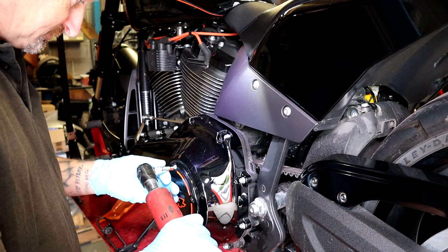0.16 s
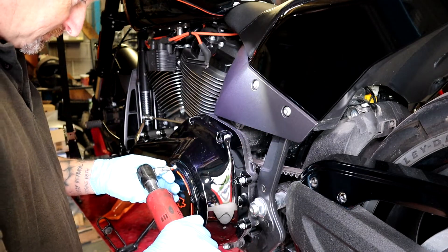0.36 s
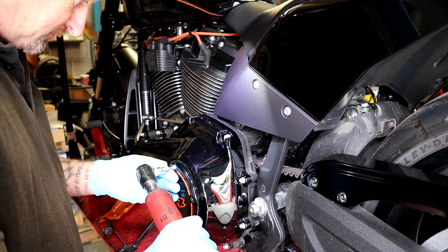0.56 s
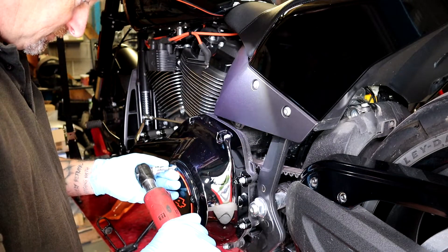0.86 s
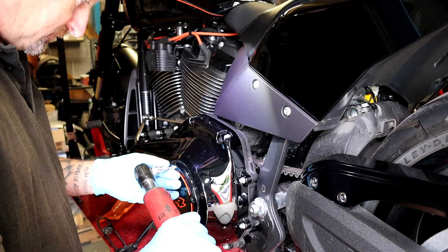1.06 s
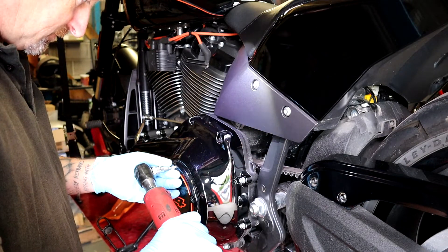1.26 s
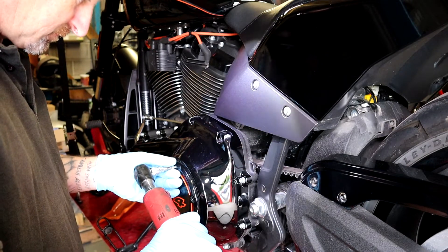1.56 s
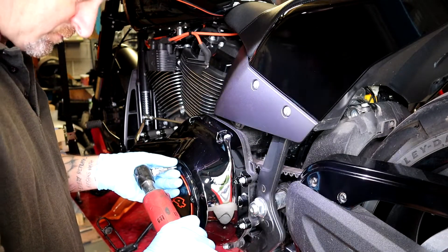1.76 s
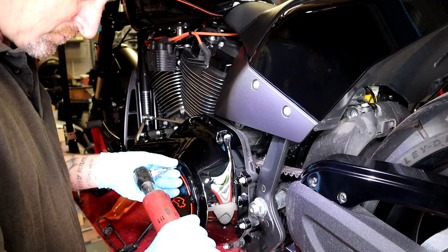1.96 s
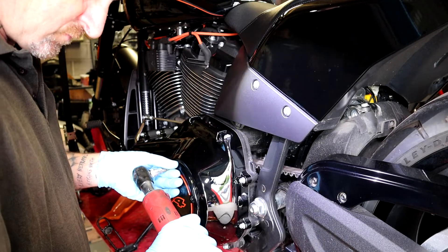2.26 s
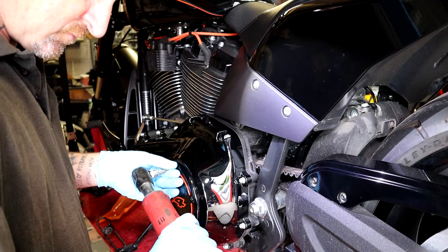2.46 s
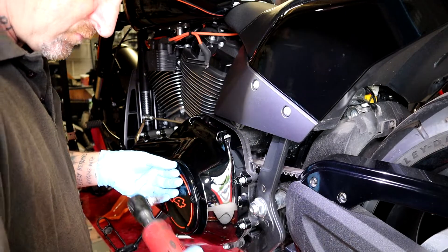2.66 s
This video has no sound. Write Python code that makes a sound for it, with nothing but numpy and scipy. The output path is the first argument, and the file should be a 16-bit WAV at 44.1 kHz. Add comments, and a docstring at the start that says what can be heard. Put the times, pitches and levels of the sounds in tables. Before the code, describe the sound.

A cordless power ratchet runs close by in a garage. Faint fan-like hum, then at 0.1 s a tiny whistle, hard loose knocks and a short hollow metal ring as a screw breaks free. A harsh, grating buzz of rapid clicks rises to its fastest near 0.8 s, sinks by 1.5 s, climbs mildly to 2.3 s, stops around 2.57 s with weak clicks and a short room tail, leaving hum.

```python
"""A cordless ratchet spins a screw out in a garage. A fan-like hum, filtered noise, stands behind throughout.
The speed switch whistles thinly (a sine), then the tool takes up with a few loose knocks. Its motor turns a crank:
each turn grinds the gears and scrapes the pawl (random taps) and knocks the drive home (bursts of noise), over tones.
Gain control ducks everything as it starts. The screw breaks loose, a cover rings (sines); the crank speeds up, slows,
speeds up again a little and runs out with three last loose knocks. A noise tail gives the garage."""
import sys
import numpy as np
from scipy import signal
from scipy.io import wavfile
from scipy.ndimage import uniform_filter1d

SR = 44100
rng = np.random.default_rng(int(sys.argv[2]) if len(sys.argv) > 2 else 0)


def generate_wav(signal):
    """Clip the signal to [-1, 1] and save it as 16-bit WAV at the path in sys.argv[1]."""
    frames = np.transpose(np.atleast_2d(signal))
    scaled = np.clip(frames, -1, 1) * 32767
    pcm = np.round(scaled).astype(np.int16)
    wavfile.write(sys.argv[1], SR, pcm)


def gain_from_db(level_db):
    """Turn a decibel level (scalar or array-like) into a linear amplitude factor."""
    decades = np.asarray(level_db, float) / 20
    return 10 ** decades


N = 123479

# Background hum spectrum. Each row: frequency in Hz, relative level in dB.
HUM_SPECTRUM = [(40, -53.5), (120, -20.5), (200, -26), (480, -19.5), (650, -5.5), (900, -5.5), (1050, -6.5),
                (1350, -20.5), (2500, -18), (3700, -28.5), (8000, -50), (15000, -51)]
# Crank speed over time. Each row: time in seconds, speed in turns per second.
CRANK_SPEED = [(0.12, 38.01), (0.2, 50.41), (0.28, 53.94), (0.4, 54.5), (0.52, 55.79), (0.62, 63.46),
               (0.72, 70.55), (0.8, 77.06), (0.88, 76.35), (0.96, 74.27), (1.06, 63.92), (1.16, 57.38),
               (1.28, 53.45), (1.42, 51.04), (1.52, 50.46), (1.64, 54.62), (1.8, 55.44), (2.05, 57.28),
               (2.2, 61.0), (2.3, 62.98), (2.38, 61.25), (2.46, 56.47), (2.56, 54.24)]
# Loudness of the running tool. Each row: time in seconds, gain in dB.
RUNNING_LEVEL = [(.09, -28), (0.101, -23), (0.114, -7), (0.119, 1.5), (.17, -3.5), (.23, -5.5), (.42, -6),
                 (.56, -4), (.63, -7), (.74, -5.5), (.85, -8), (1.05, -8.5), (1.22, -9.5), (1.37, -11),
                 (1.66, -10), (1.9, -9.5), (2.15, -9.5), (2.33, -8.5), (2.46, -10.5), (2.546, -11.5),
                 (2.571, -36.5), (2.6, -45)]
# Stroke within one crank turn, at the reference speed. Each row: place in the turn from 0 to 1,
# gear grind gain in dB, pawl scrape gain in dB.
STROKE_SHAPE = [(0, 1, -1), (.15, 2, 0), (.24, -3, -12), (.36, -6.5, -20), (.5, -1, -9), (.62, -4, -13),
                (.72, -1, -1), (.9, 0, 0)]
# Resonances of the tool housing. Each row: frequency in Hz, width in Hz, boost in dB.
HOUSING_RESONANCES = [(503.5, 113, 16), (940, 21, 3.5), (1917, 150, 3), (2230, 120, -1.5), (2360, 260, 0.5),
                      (4530, 500, -0.5)]
# Gear grind spectrum, before the housing. Each row: frequency in Hz, relative level in dB.
GRIND_SPECTRUM = [(60, -44.5), (200, -38), (300, -26), (420, -27), (560, -20.5), (705, -7), (1000, -5.5),
                  (1420, -8), (2000, -1), (2530, 2.5), (3050, -5), (4030, -3), (6500, -15), (10000, -36.5),
                  (11500, -22.5), (15500, -30.5)]
# Tones of crank and motor, at the reference speed. Each row: multiple of crank speed, middle level in dB.
CRANK_TONES = [(3, -47), (4, -42), (4.36, -39), (6, -33), (7, -33), (8, -29), (9, -25), (10, -24),
               (11, -24), (12, -24), (13, -23), (14, -26), (15, -25), (16, -26), (17, -25)]
# Pawl scrape spectrum, before the housing. Each row: frequency in Hz, relative level in dB.
SCRAPE_SPECTRUM = [(1500, -40), (3000, -10), (5000, -3), (7000, -6), (9800, -17.5), (11500, -12.5),
                   (15500, -43)]
# Knock spectrum, before the housing. Each row: frequency in Hz, relative level in dB.
KNOCK_SPECTRUM = [(500, -26), (1500, -21.5), (2500, 8), (3300, 2), (4500, 5), (6500, -12), (9800, -23.5),
                  (11500, -52), (15500, -65)]
# Loose knocks at take-up and run-out. Each row: time in seconds, strength of the driving impulse in dB.
SLACK_KNOCKS = [(0.1184, -1), (0.126, 2), (.136, -11), (0.15, -13), (0.164, 9), (.182, 6.5), (0.237, 6),
                (2.577, -21), (2.588, -11.5), (2.607, -14)]
# Cover ringing as the screw breaks loose. Each row: frequency in Hz, relative level in dB, t60 in seconds.
COVER_RINGS = [(510, 0, 0.18), (609, -3.5, 0.078), (720, -1, 0.14), (876, 1.5, 0.072), (960, -8, 0.17),
               (2100, 6, .08)]
# Decay of the garage. Each row: frequency in Hz, t60 in seconds.
GARAGE_DECAY = [(500, 0.7), (2500, 0.54), (5000, 0.44), (10000, 0.3), (15000, 0.2)]

HUM_DB, HUM_FLUTTER_DB = -29, 0.5
WHINE_S, WHINE_LENGTH_S, WHINE_HZ, WHINE_DB = 0.086, 0.024, 7800, -52
FIRST_TURN = -0.033  # crank position at the start, in turns
# Above the reference speed: shallower strokes, more grind and tone
REFERENCE_TURNS_PER_S, BLUR_PER_TURN_S = 53.8, 0.027
GRIND_DB_PER_TURN_S, TONES_DB_PER_TURN_S = 0.0859, 0.3745
ENGAGE_S = 0.118  # pawl and drive knock start here
GRIND_DB, GRIND_TAPS_PER_S, GRIND_SPREAD_DB = 0, 5000, 2.5
TONE_WAVER_DB, TONE_WAVER_S = 2.5, 0.1
SCRAPE_DB, SCRAPE_TAPS_PER_S, SCRAPE_SPREAD_DB = -8, 13000, 2.2
KNOCK_DB, KNOCK_AT_TURN, KNOCK_JITTER_TURN, KNOCK_SPREAD_DB = -5.5, 0.086, 0.03, 3.5
KNOCK_RISE_S, KNOCK_T60_S = 0.0006, 0.008
BITE_S, BITE_RISE_S, BITE_DB = 0.146, 0.0048, -3
GARAGE_DB = -14.5
KNEE_DB, SQUEEZE, RECOVER_DB_PER_S, AHEAD_S = -27, 0.38, 0.5, 0.016
SOFT_FROM = 0.6  # fraction of full scale


def evened(x):
    """Bring a layer to an rms of one."""
    return x / np.sqrt(np.mean(x ** 2) + 1e-20)


def read(points, hz):
    """Read a curve along a logarithmic frequency axis."""
    f, value = np.transpose(points)
    return np.interp(np.log(hz + 1), np.log(f + 1), value)


def coloured(x, points, housing=True):
    """Causal minimum-phase filter from a spectrum, with the housing's resonances on top."""
    hz = np.abs(np.fft.fftfreq(4096, 1 / SR))
    db = read(points, hz)
    if housing:
        for centre, width, boost_db in HOUSING_RESONANCES:
            db = db + boost_db / (1 + (2 * (hz - centre) / width) ** 2)
    log_gain = np.log(gain_from_db(np.maximum(db, -100)))
    spectrum = np.exp(np.conj(signal.hilbert(log_gain)))
    taps = np.fft.ifft(spectrum).real[:2048]
    return signal.oaconvolve(x, taps / np.linalg.norm(taps))[:N]


def clicks(per_s, spread_db):
    """Dense random taps of either sign, a few of them large."""
    size = gain_from_db(spread_db * np.minimum(rng.exponential(1, N), 5))
    sign = rng.choice([-1., 1.], N)
    return size * sign * (rng.random(N) < per_s / SR)


def spikes(times, sizes):
    """Single-sample impulses that set off the knocks."""
    out = np.zeros(N)
    places = np.clip(np.round(times * SR).astype(int), 0, N - 1)
    np.add.at(out, places, sizes)
    return out


def hum():
    """Steady fan-like noise, strongest in one low band, with a slight flutter in level."""
    flutter = evened(uniform_filter1d(rng.standard_normal(N), 600))
    noise = evened(coloured(rng.standard_normal(N), HUM_SPECTRUM, housing=False))
    return gain_from_db(HUM_DB + HUM_FLUTTER_DB * flutter) * noise


def whine():
    """A thin short whistle from the speed switch: one sine under a rounded swell."""
    t = np.arange(N) / SR
    swell = np.sin(np.pi * np.clip((t - WHINE_S) / WHINE_LENGTH_S, 0, 1)) ** 0.5
    return gain_from_db(WHINE_DB) * swell * np.sin(2 * np.pi * WHINE_HZ * t)


def ratchet():
    """Gears, tones, pawl and drive locked to one crank, plus loose knocks at take-up and run-out."""
    t = np.arange(N) / SR
    speed = np.interp(t, *np.transpose(CRANK_SPEED))
    turns = FIRST_TURN + np.cumsum(speed) / SR
    faster = speed - REFERENCE_TURNS_PER_S
    depth = np.clip(1 - BLUR_PER_TURN_S * faster, 0, 2)
    engaged = t > ENGAGE_S

    running = gear_grind(turns, faster, depth)
    running = running + tones(turns) * gain_from_db(TONES_DB_PER_TURN_S * faster)
    running = running + pawl_scrape(turns, depth, engaged)
    running = running + drive_knocks(turns, engaged)
    level_s, level_db = np.transpose(RUNNING_LEVEL)
    level = gain_from_db(np.interp(t, level_s, level_db, -120, -120))
    return running * level + slack_knocks()


def gear_grind(turns, faster, depth):
    """Random gear-tooth taps, swelling and sinking with each turn and louder with speed."""
    place, grind_db, _ = np.transpose(STROKE_SHAPE)
    stroke_db = depth * np.interp(turns, place, grind_db, period=1)
    taps = clicks(GRIND_TAPS_PER_S, GRIND_SPREAD_DB) * gain_from_db(stroke_db + GRIND_DB_PER_TURN_S * faster)
    return gain_from_db(GRIND_DB) * evened(coloured(taps, GRIND_SPECTRUM))


def tones(turns):
    """Clean lines at multiples of the crank speed, each wavering by itself."""
    out = np.zeros(N)
    for multiple, db in CRANK_TONES:
        # The waver is drawn once per 100 samples, then smoothed
        coarse = rng.standard_normal(N // 100 + 2)
        waver = evened(uniform_filter1d(coarse, max(round(TONE_WAVER_S * SR / 100), 1)))
        waver = np.interp(np.arange(N) / 100, np.arange(len(waver)), waver)
        tone = np.sin(2 * np.pi * (multiple * turns + rng.random()))
        out += gain_from_db(db + TONE_WAVER_DB * waver) * tone
    return out


def pawl_scrape(turns, depth, engaged):
    """The pawl drags back over the teeth once a turn: dense random taps shaped by the stroke."""
    place, _, scrape_db = np.transpose(STROKE_SHAPE)
    stroke = gain_from_db(depth * np.interp(turns, place, scrape_db, period=1))
    taps = clicks(SCRAPE_TAPS_PER_S, SCRAPE_SPREAD_DB) * stroke * engaged
    return gain_from_db(SCRAPE_DB) * evened(coloured(taps, SCRAPE_SPECTRUM))


def knocks(train):
    """Each blow is a short noisy chatter that starts sharply and dies away within milliseconds."""
    t = np.arange(-SR // 50, SR // 50) / SR
    shape = np.where(t < 0, np.exp(t / KNOCK_RISE_S), gain_from_db(-60 * t / KNOCK_T60_S))
    chatter = signal.oaconvolve(train, shape, "same") * rng.standard_normal(N)
    return coloured(chatter, KNOCK_SPECTRUM)


def drive_knocks(turns, engaged):
    """The drive knocks home once a turn, a little early or late, softer or harder."""
    t = np.arange(N) / SR
    count = np.arange(int(turns[-1]))
    late, hard = np.clip(rng.standard_normal((len(count), 2)).T, -1.6, 1.6)
    when = np.interp(count + KNOCK_AT_TURN + KNOCK_JITTER_TURN * late, turns, t)
    blows = spikes(when, gain_from_db(KNOCK_SPREAD_DB * hard)) * engaged
    return gain_from_db(KNOCK_DB) * evened(knocks(blows))


def slack_knocks():
    """Loose play knocks at take-up and run-out, made of the same chatter as the drive."""
    when, strength_db = np.transpose(SLACK_KNOCKS)
    return knocks(spikes(when, gain_from_db(strength_db)))


def bite():
    """The cover rings as the screw breaks loose: a chord of dying sines with a short ramp in."""
    t = np.maximum(np.arange(N) / SR - BITE_S, 0)
    ring = np.zeros(N)
    for hz, db, t60 in COVER_RINGS:
        ring += gain_from_db(BITE_DB + db - 60 * t / t60) * np.sin(2 * np.pi * hz * t)
    return np.minimum(t / BITE_RISE_S, 1) * ring


def garage(x):
    """Reverb from a noise tail, 5 ms late, each band dying at its own speed."""
    hz, t, z = signal.stft(rng.standard_normal(SR), SR, nperseg=256)
    decay = gain_from_db(-60 * t / read(GARAGE_DECAY, hz)[:, None])
    tail = signal.istft(z * decay, SR, nperseg=256)[1]
    response = np.r_[np.zeros(SR // 200), tail] / np.linalg.norm(tail)
    return signal.fftconvolve(x, response)[:N]


def scene():
    """Tool, its garage reverb and the dry hum, in mono."""
    tool = whine() + ratchet() + bite()
    return (tool + gain_from_db(GARAGE_DB) * garage(tool) + hum())[None]


def gain_controlled(x):
    """Gain control looks slightly ahead, drops fast and recovers slowly."""
    power_db = 10 * np.log10(abs(uniform_filter1d(x[0] ** 2, 800)) + 1e-12)
    ahead = round(AHEAD_S * SR)
    power_db = np.r_[power_db[ahead:], np.full(ahead, power_db[-1])]
    # Hold the highest level so far, letting it sink at a steady rate
    fall = np.arange(N) * RECOVER_DB_PER_S / SR
    held_db = np.maximum.accumulate(power_db + fall) - fall
    over_db = np.maximum(held_db - KNEE_DB, 0)
    return x / gain_from_db(SQUEEZE * uniform_filter1d(over_db, 200))


def limited(x):
    """Peaks above SOFT_FROM bend smoothly towards full scale."""
    room = 1 - SOFT_FROM
    rounded = np.sign(x) * (SOFT_FROM + room * np.tanh((abs(x) - SOFT_FROM) / room))
    return np.where(abs(x) < SOFT_FROM, x, rounded)


def band_limit(x):
    """A steep low-pass at the top of the band."""
    return signal.sosfilt(signal.butter(12, 15780, fs=SR, output="sos"), x)


def record(dry):
    """Duck the scene with the gain control, then round off its peaks."""
    mix = limited(gain_controlled(dry))
    return band_limit(mix)


dry = scene()
out = record(dry)
generate_wav(out)
```